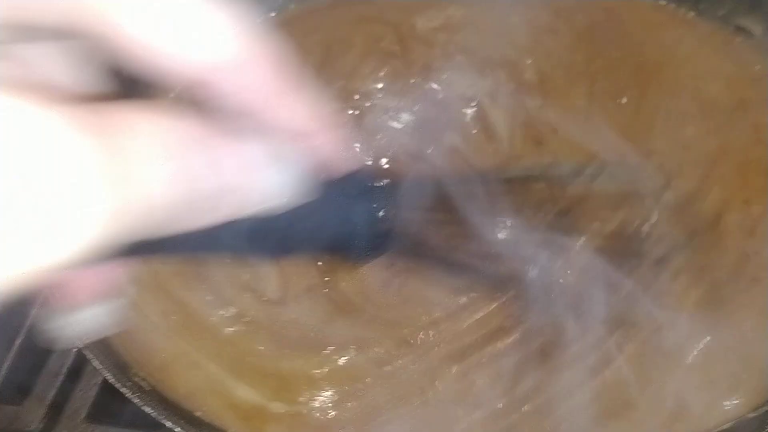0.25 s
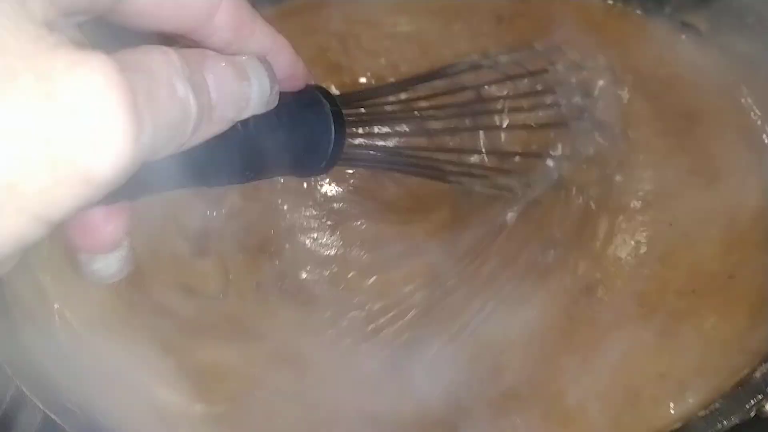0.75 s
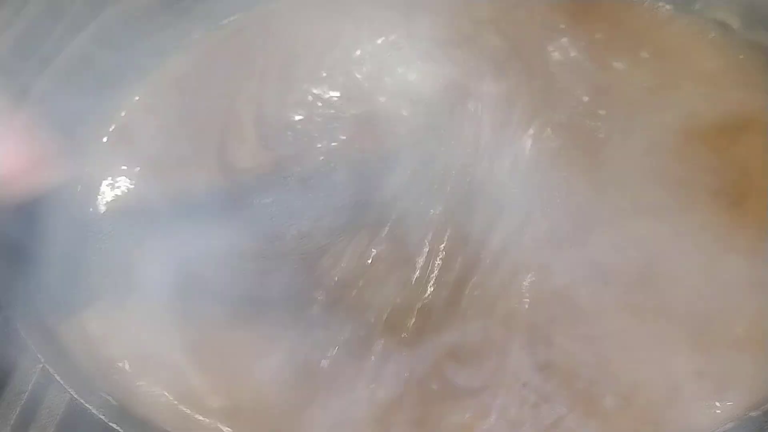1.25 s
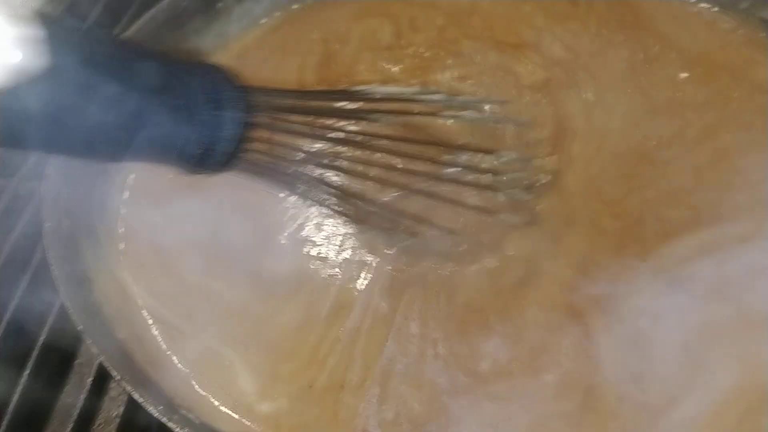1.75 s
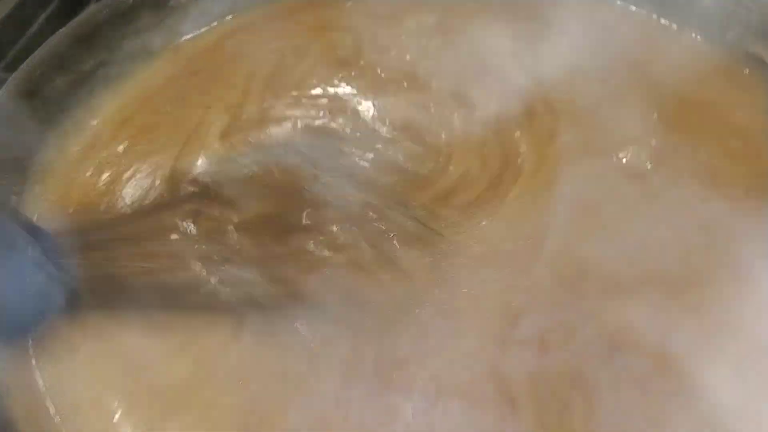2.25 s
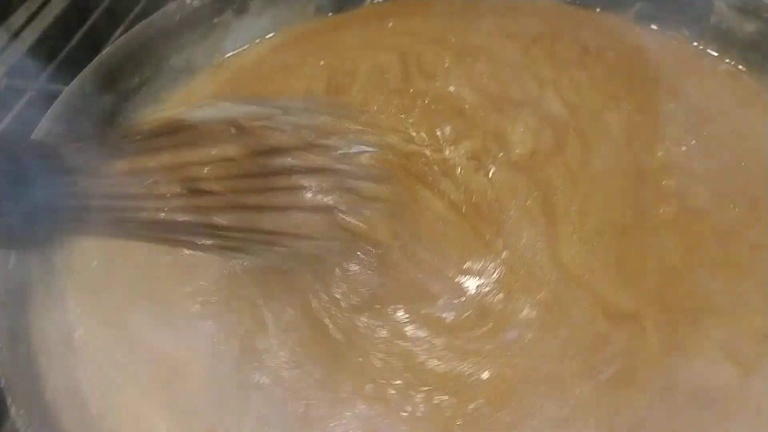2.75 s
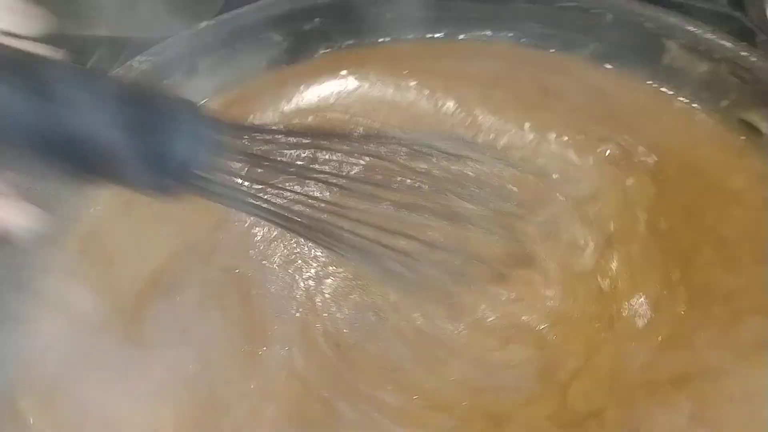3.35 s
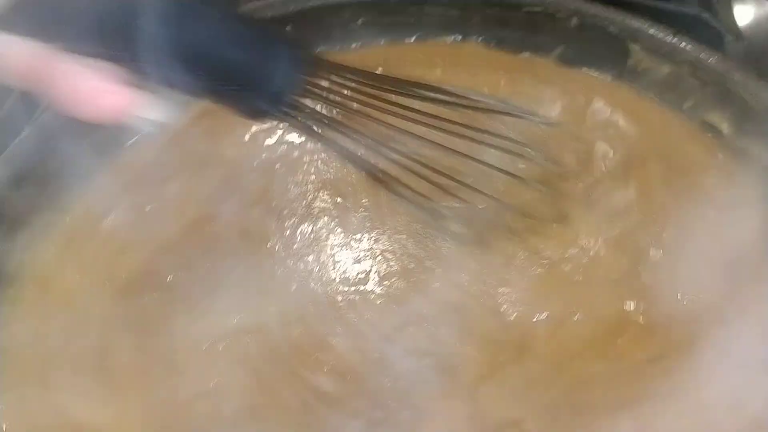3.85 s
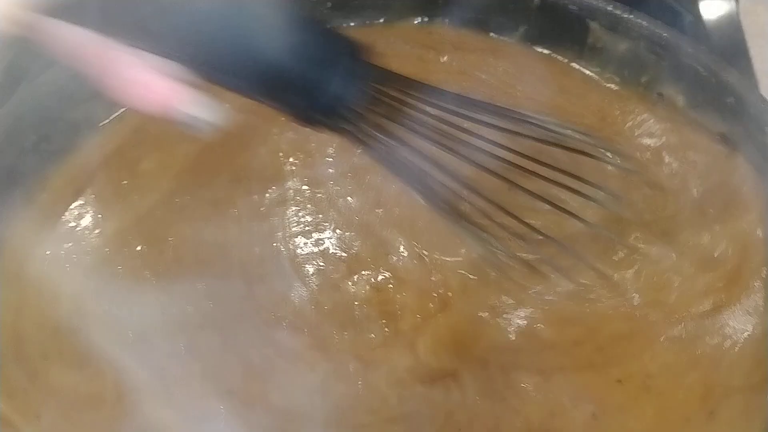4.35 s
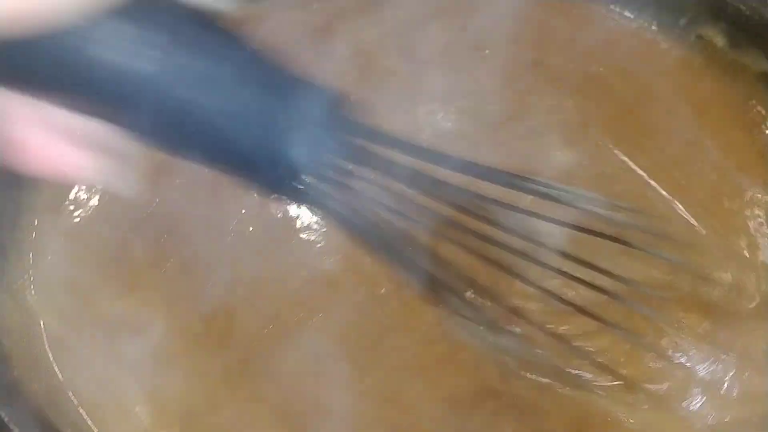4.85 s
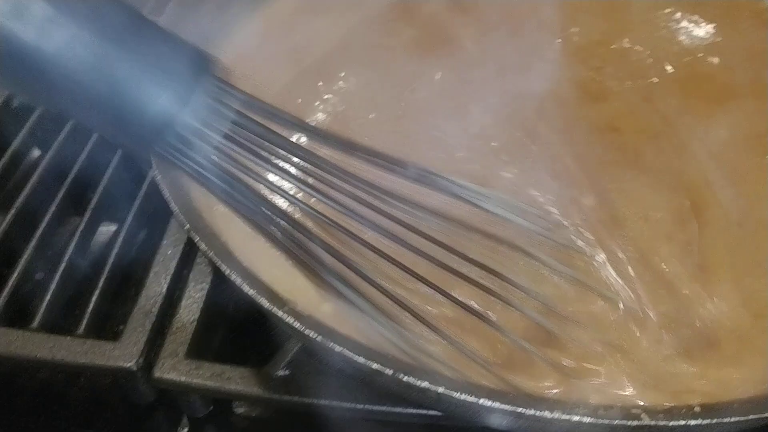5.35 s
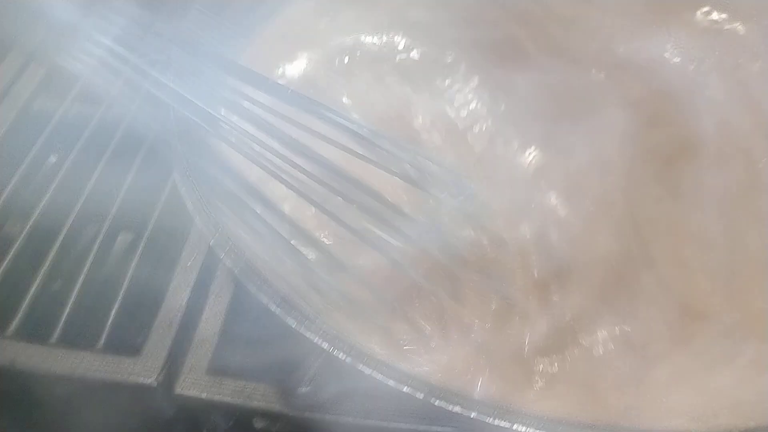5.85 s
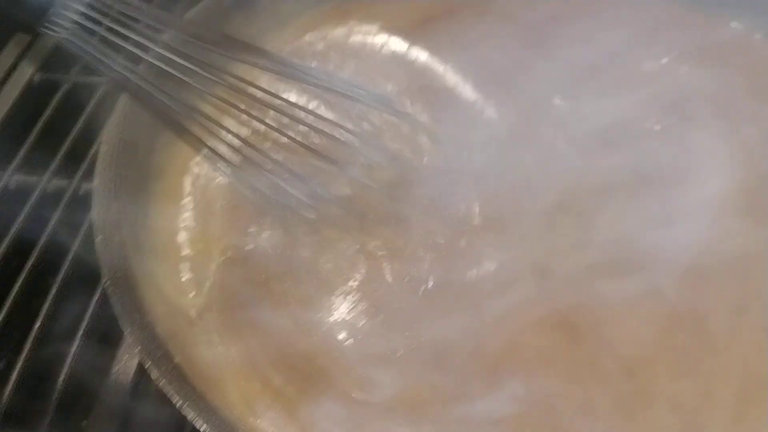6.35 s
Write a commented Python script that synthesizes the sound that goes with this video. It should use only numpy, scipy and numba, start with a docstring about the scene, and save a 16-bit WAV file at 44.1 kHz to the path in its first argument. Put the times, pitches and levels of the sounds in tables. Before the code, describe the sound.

Quick, gritty swishes of thin wires on metal, each swelling and sinking, ring a skillet briefly and hiss brightly above it. After an early crack against the recording device, the separate strokes give way to a short lull, then faster, nearly continuous scrubbing with irregular clicks. Thick liquid sloshes dully underneath. The stereo pickup is very close, and the room is quiet with little echo.

```python
"""In a kitchen, a wire whisk sweeps to and fro through gravy in a metal skillet, a phone held close above.
Noise shaped like tiny slips of the wire tips rings the skillet's fading modes and the thin wires.
Wires also tick against the pan; banded noise makes the slosh of gravy and a faint kitchen hum.
A finger knocks the phone once in a sharp crack, and the pan thuds softly on its grate."""
import sys
import numpy as np
from scipy import signal
from scipy.io import wavfile
from scipy.ndimage import uniform_filter1d
from numba import njit

SR = 44100
rng = np.random.default_rng(int(sys.argv[2]) if len(sys.argv) > 2 else 0)


def digitize_waveform(pressure):
    """Quantize a signal to 16-bit integers and store it at the path in sys.argv[1].

    Rows of a 2-D input are taken as channels; values are limited to [-1, 1].
    """
    field = np.atleast_2d(pressure).T
    bounded = np.clip(field, -1, 1)
    quanta = np.round(bounded * 32767).astype(np.int16)
    wavfile.write(sys.argv[1], SR, quanta)


N = 291501  # length of the scene [samples]
STEP = 32  # slow controls have one value per this many samples

# One row per whisk stroke: (time of full push [s], hold [s], rasp level [dB], lull before it re rasp [dB],
# then re rasp: bowl ring, pan floor, low, middle, high wall modes, wire hiss [all dB],
# push lost during the hold [dB], tilt of the low and of the middle wall modes
# toward their upper members [dB per 10 % of pitch])
WHISK_STROKES = [(0.003, 0.0031, -51.5, 14, -26, -9, -5, -6.5, -12, -12, 10, 0.1, -1),
                 (0.102, 0.062, -42, -16, -16.5, -11, -4.5, -6, -9, -12.5, 1.3, -1, 1.5),
                 (0.288, 0.081, -46.5, -13, -18, -5, 0, -1.5, -9.5, -8, 2, 1, 0),
                 (0.51, 0.066, -43.5, -21, -21, -8.5, 1, -6, -11, -17, 2, 2, 2),
                 (0.69, 0.077, -45, -20, -11, -5, 1, 2, -6.5, -4.5, 2, 1.9, 0),
                 (0.92, 0.068, -43, -18.5, -18, -17, -2.5, -2, -10.5, -10, 2, -0.3, -1),
                 (1.084, 0.055, -39.5, -20, -8.5, -13, -6, -3, -3, -4.5, 2, 0.6, 0.5),
                 (1.284, 0.066, -41.5, -11.0, -18.5, -15, -9.5, -5, -5, -8, -2, 2.3, 0.5),
                 (1.47, 0.047, -41, -17, -13.5, -10.5, -7, -0.5, -5, -5, -1.8, -1.5, -1.7),
                 (1.695, 0.066, -66, 0, -30, -10, -11, -3.5, -16, 5, 4, -6.5, -4.5),
                 (1.776, 0.01, -70, 2, -40, -3, -4, -2, -14, 12, 0.2, -15, -7),
                 (1.874, 0.062, -70, -1.5, -7, 4.5, 5, 1, -16, 2.5, 3, -2.5, 0),
                 (2.045, 0.053, -80, -0.5, 4, -10, -7, -4, -13, 4, -2, 0.1, -6),
                 (2.229, 0.0078, -50.5, -29, 0.5, -5, 3.5, -5, -16, -17, 0.2, -1.3, 1),
                 (2.313, 0.045, -39.5, -16, -11, -8, -3.5, -2.5, -3, -5, -2.5, 1.3, -0.5),
                 (2.422, 0.042, -42, -7, -14.5, -13, 0.5, -6, -8.5, -11.5, 0.5, -0.5, -0.5),
                 (2.582, 0.023, -41.5, -10.5, -11.5, -4.5, -2, -0.5, -3, -6, -2.5, -1, 1),
                 (2.699, 0.04, -38.5, -8.5, -20.5, -14, -1.5, -8.5, -8.5, -10.5, -1.5, -2.5, 0.5),
                 (2.818, 0.049, -40.5, -8, -13.5, -5, -2, -1, -8, -6.5, -1.3, -4, 1),
                 (2.968, 0.029, -37.5, -13, -11.5, -7.5, -0.5, -7, -2.5, -7.5, -2, -0.5, -1),
                 (3.077, 0.046, -37.5, -9, -16.5, -6.5, -4, -8.5, -8.5, -8.5, 1.5, -1, -1),
                 (3.223, 0.017, -39.5, -12, -11, -3.5, -5.5, -5, -3.5, -7.5, -5, 4, 2.5),
                 (3.333, 0.043, -40.5, -9.5, -12, -2.5, -0.5, -6, -12, -7, -1, 2, 0.1),
                 (3.477, 0.037, -37, -16.5, -16, -4.5, -2, -1.5, -8, -7.5, 4.5, 5, 2.5),
                 (3.585, 0.061, -41, -9, -14.5, -10, -3.5, -2, -10.5, -5, 1, 2, 3.5),
                 (3.727, 0.03, -38, -17, -19, -6.5, -2, 0, -7.5, -7.5, 5, 1.5, -2),
                 (3.836, 0.039, -42.5, -7.5, -19.5, -9, -2.5, -1, -5.5, -3, -4.5, 5, 4.5),
                 (3.969, 0.041, -42, -12.5, -17, -4, 0.5, 0, -8, -5, -1, 1.5, 3.5),
                 (4.075, 0.05, -40, -10, -29, -14, -7.5, -6, -7, -5.5, 2, 2.5, 2.5),
                 (4.23, 0.025, -38.5, -16.5, -21, -4.5, -2.5, -8, -10.5, -10.5, 4.5, 0.1, 3),
                 (4.331, 0.046, -42.5, -7, -17.5, -13, -6, -5, -6, -3, 2.5, -1, -2.5),
                 (4.474, 0.036, -41, -9.5, -14.5, -5, -3.5, -2.5, -11.5, -10, 0, -7, 4),
                 (4.578, 0.025, -38.5, -12, -47, -15, -11, -8, -9, -4.5, -4, -4, 4.5),
                 (4.73, 0.042, -39.5, -8, -8.5, -2.5, -10.5, -3.5, -9, -10.5, 2.5, -4, -5.5),
                 (4.833, 0.036, -35, -16, -42, -15.5, -21, -11.5, -7.5, -11.5, -3.5, -4, -0.5),
                 (4.989, 0.03, -38.5, -6.5, -5, -9.5, -5.5, -6, -6.5, -6.5, 0.8, -2, 2),
                 (5.088, 0.043, -38.5, -16, -25.5, -10, -3.5, -3, -4, -3, 2, 0, 0.1),
                 (5.238, 0.043, -42, -8.5, -12.5, -15, 4.5, -3, -2, -4.5, -0.3, -4, 0.1),
                 (5.349, 0.021, -34.5, -14.5, -16, -21, -3, -7.5, -4.5, -12, -1, 2.5, 4),
                 (5.472, 0.041, -39, -4, -21, -30, -9, -4, -5.5, -5.0, -2.5, 1, -1),
                 (5.585, 0.04, -40.5, -8.5, -13, -16, -4, -1, -6.5, -7, -0.5, 2, -2.5),
                 (5.72, 0.041, -36, -9, -30, -35, -11, -7, -2.5, -5, -2.5, 3, 1.5),
                 (5.824, 0.074, -39.5, -6, -15.5, -20, -3.5, -7, -10.5, -9, 1, -2, -2.5),
                 (5.97, 0.039, -37, -16.5, -41, -19, -8.5, -4.5, 1, -1, 1.5, -2, 1),
                 (6.091, 0.051, -42, -5.5, -11, -21, -2.5, -3.5, -3, -7.5, 3, 3, -3),
                 (6.212, 0.042, -36.5, -19.5, -33, -23.5, -4.5, -4.5, -1.5, -3.5, -1.5, 2.5, 4),
                 (6.33, 0.053, -45.5, -5.5, -5, -7, -0.5, -4, -2.5, -2.5, 2.5, 3.5, 0),
                 (6.475, 0.022, -39.5, -15.5, -16.5, -15, -5.5, -2.5, -2, -4.5, 1, 5.5, 2),
                 (6.582, 0.022, -38, -7.5, -21, -13.5, -11, -1, -5.5, -7, -3, 6.5, -5)]
# Groups of close skillet modes: (centre [Hz], spread [Hz], time to fade by 60 dB [s],
# level at pan centre [dB], level near rim [dB], left minus right [dB])
PAN_MODES = [(411, 25, 0.5, -20, -12.5, 11.5), (495.4, 85, 0.18, -13, -14, 1),
             (619.1, 42, 0.21, 3.5, -1, 1), (748.4, 116.5, 0.29, -9, -20.5, 13),
             (997, 101, 0.29, -6, -12.5, -5), (1107, 116.5, 0.15, -11.5, -0.5, -4),
             (1191, 144, 0.093, 0.5, -19, 3), (1501, 133, 0.12, -0.5, -31, -7),
             (1720, 170, 0.086, -8, -6, -3.5), (1831, 95, 0.1, -11.5, -7, -15),
             (2012, 280, 0.15, -6.5, -22, -9.5), (2271, 78, 0.1, -8, -15, -11),
             (2433, 155, 0.05, -16, -4, -11), (2505, 140, 0.094, -24.5, 0.5, -14),
             (2746, 206, 0.09, -13.5, -5, -10.5), (3064, 140, 0.064, -9, -31.5, -11),
             (3383, 148, 0.22, -15.5, -7.5, -2.5), (3862, 186, 0.057, -8, -1.5, -7),
             (3986, 176, 0.058, -11.5, -9, -10.5), (4274, 110, 0.043, -12.5, -11, -4.5),
             (5230, 270, 0.049, 0.5, -0.9, 1), (5647, 420, 0.039, -14.5, -2, -2)]
# Resonances of the whisk wires: (centre [Hz], width setting [Hz], relative level at pan centre [dB],
# relative level near rim [dB], left minus right [dB])
WIRE_RESONANCES = [(4560, 210, -9, -10, 10), (5900, 390, -3, -15, 1.5), (6920, 720, -8, -3.5, 2),
                   (8314, 840, -4, 0, -1), (9326, 780, 0.5, -1, -2.5), (10770, 1000, -5.5, 0.5, -0.5),
                   (12900, 1300, -5, -4.5, -5), (14900, 4400, -6.5, 1, -2)]
# Wires slap the pan: (time [s], level setting [dB], pan ring relative to it [dB])
WIRE_TICKS = [(0.113, -59, 3), (0.524, -38.5, 10), (0.5926, -42, 7), (0.8665, -54, -12),
              (0.8752, -43.5, 19), (0.9271, -32.5, 10), (1.05, -34, 0.5), (1.227, -36, -3),
              (1.2447, -40, 12), (1.389, -37.5, -21), (1.6253, -56, -3), (1.6867, -31, 6), (1.785, -52, 3),
              (1.9288, -57.5, 27), (2.0414, -58, -3), (2.185, -65, 29), (2.2493, -37, 9), (2.273, -44, -10),
              (2.302, -58, 7), (2.5682, -41, 14), (2.801, -50.5, 26), (2.928, -42, 15), (3.2176, -50, -7),
              (3.4572, -26, -21), (3.572, -52, 6), (3.704, -25.5, -27), (3.9534, -24, -33),
              (3.9693, -37, -5), (4.212, -32.5, -22), (4.479, -28.5, -7), (4.5706, -57, -3),
              (4.7366, -41, 16), (5.0728, -39, 21), (5.2, -44, 8), (5.338, -47, 9), (5.381, -38, 7),
              (5.3996, -28, -25), (5.413, -20.5, -9), (5.559, -27.5, -22), (5.671, -42.5, 19),
              (5.7096, -45, 3), (5.807, -34, 9), (5.967, -44, 0), (6.206, -39, 15), (6.4591, -24, 2),
              (6.487, -34, -5)]
# The pan rocks on its grate: (time [s], peak before the left-right split [dB])
PAN_THUDS = [(0.718, -52.5), (1.888, -77), (2.175, -66), (2.578, -54), (2.944, -68), (3.089, -66),
             (3.868, -64), (4.799, -57), (5.122, -65), (5.816, -70)]
# A finger on the case by one microphone port: (level setting [dB], left minus right [dB], decay [s])
FINGER_KNOCK = (-31, -28.5, 0.00035)
# Kitchen hum bands: (centre [Hz], filter width [Hz], level before wavering [dB], left-right likeness [0-1])
KITCHEN_HUM = [(59.7, 29, -88, 1), (94, 19, -82, 0.94), (168, 110, -86.5, 0.78), (232, 21, -83.5, 0.7),
               (330.6, 63, -74.5, 0.65), (416, 30, -70.5, 0.9), (2400, 1500, -92, .1),
               (11200, 1700, -83.5, .05)]
# Gravy pushed by the wires: (base pitch [Hz], width setting [Hz])
SLOSH_TONE = (208.2, 174)
# Level of the gravy before its quick wavering: (time [s], level [dB])
SLOSH_LEVELS = [(0.2, -70), (0.23, -81), (0.32, -72.5), (1.84, -78), (1.89, -67.5), (2.09, -86),
                (2.41, -63), (2.52, -85), (2.8, -63.5), (2.89, -80), (3.3, -64.5), (3.62, -82), (3.66, -65),
                (4.0, -90), (4.16, -62), (4.32, -77.5), (4.91, -63), (5.12, -92), (5.4, -66.5), (5.62, -78),
                (5.69, -68), (6.6, -75.5)]
# Where the whisk works: (time [s], place [0 pan centre to 1 near the rim],
# bowl pitch shift under the gravy [%], high chime before stroke changes, re rasp [dB])
WHISK_ROUTE = [(.13, 0.5, -3, -23), (.32, 0.54, -2, -19.5), (.72, 0.27, -5, -15), (.94, 0.042, 3, -21.5),
               (1.11, 0.027, -0.5, -10.5), (1.5, 0.053, -2, -17.5), (1.72, 0.54, -4, -7),
               (1.9, 0.34, -1.5, -35), (2.06, 0.67, -1, -22), (2.34, 0.24, -1, -19),
               (2.45, 0.37, -2, -20.5), (2.6, 0.46, 2, -19), (2.72, 0.5, -1, -18), (2.85, 0.69, 2, -13),
               (3.2, 0.8, 1.8, -20), (3.6, 0.61, -.5, -15.5), (4.1, 0.59, 0.5, -17),
               (4.35, 0.77, 1.1, -15.5), (4.7, 0.64, -2.5, -18.5), (5.05, 0.85, -0.6, -12),
               (5.28, 0.7, 0.5, -17.5), (5.38, 0.84, 3.5, -15), (5.6, 0.63, 5, -15.5),
               (5.75, 0.71, 5.5, -19), (6.2, 0.86, 6, -17), (6.5, 0.69, -2.7, -13)]
# Pitches that part the modes into bowl, floor, low, middle, high and chime groups: (edge [Hz])
MODE_GROUP_EDGES = [850, 1330, 2120, 3200, 4800]
# Pitches about which the low and the middle wall modes tilt: (pivot [Hz])
TILT_PIVOTS = [1700, 2550]
# Slow drift of colour: (time [s], pitch shift of the low, middle and high wall modes [all %],
# relative level of the hiss above 11.5 kHz [dB])
COLOUR_DRIFT = [(0.1, 0.5, -1.05, 0.73, -4), (0.6, 0.5, 1.15, 0.82, -5), (1.1, -0.86, 0.24, 1, -2),
                (1.6, 0.3, 0.73, 0.11, -0.5), (2.0, 0.3, 0.3, 0.52, -0.5), (2.5, -0.78, -0.86, 0.3, 0),
                (3.0, 0.16, -1.17, 0.47, -0.5), (3.5, 0.23, -1.25, 0.6, -0.5), (4.0, 0.54, 0.43, 0.41, 0),
                (4.5, -2.1, 0.6, 0.35, 2), (4.9, -1.8, -0.25, -0.44, -1.5), (5.3, -0.82, 0.72, -0.69, 2.5),
                (5.7, -1.6, 1.04, -0.46, 0), (6.1, -2.1, 1.24, -0.92, -1.5), (6.5, -1.8, 1.4, -0.68, 3)]

RISE_SHARE_PER_10_DB, SHORTEST_RISE_S = 0.24, 0.0038  # share of the gap spent climbing, per 10 dB of lull
FALL_SHARE, LONGEST_FALL_S = 0.58, 0.09  # share of the rest of the gap spent sinking; then the level rests
CHIME_PER_HIGH = 0.85  # strokes that ring the high modes chime more (dB per dB)
BOWL_LATE_S, BOWL_LULL_SHARE = 0.0059, 0.84  # the bowl answers late and sinks less in the lulls
HIGH_LULL_EXTRA = 0.35  # the high modes sink this share deeper between strokes
WANDER = 0.016  # typical share by which the moving gravy detunes each mode group
PORT_LAG_S = 0.00016  # spread of arrival lag between the two microphones as the contact moves
RATTLES_PER_S = 140  # single wires catching and springing free
RATTLE_DB, RATTLE_SCATTER_DB = -4.5, 12  # softest rattle setting re rasp, and range above it
# below this rasp level, the hiss under 9 kHz is thinner (dB lost per dB, per octave)
THIN_BELOW_DB, THINNING = -41, 0.36
TICK_PAN_DB = 1  # left minus right, for the ticks heard in the wires
KNOCK_S = 0.0555
THUD_HZ, THUD_PAN_DB = 100, 2.5  # pitch, and left minus right
THUD_T60_S, THUD_PUSH_S = 0.26, 0.0089  # time to fade by 60 dB, and length of the push
TOP_HZ = 15700  # upper limit of the phone


def undb(db):
    """Turn decibels into a plain gain."""
    return np.exp(np.asarray(db) * (np.log(10) / 20))


def unit(x):
    """Scale a sound to an average (rms) strength of 1."""
    return x / np.sqrt(np.mean(x ** 2))


def sides(db):
    """Left and right gains for a level difference."""
    return undb(np.array([[db / 2], [-db / 2]]))


def band(x, hz, width_hz):
    """Let through sound around one pitch, with gain 1 at the centre."""
    return signal.lfilter(*signal.iirpeak(min(hz, .45 * SR), hz / width_hz, fs=SR), x)


def ring(x, hz, t60):
    """One fading mode as a complex oscillation that turns and shrinks every sample."""
    pole = np.exp((2j * np.pi * hz - np.log(1000) / t60) / SR)
    return signal.lfilter([1], [1, -pole], x)


def walk(rate):
    """Random levels joined by straight lines, rate per second, one per STEP samples; spread near 1."""
    s = np.arange(N // STEP + 1) * STEP / SR
    count = int(N / SR * rate) + 2
    return np.interp(s * rate, np.arange(count), rng.standard_normal(count))


def full(slow):
    """Repeat a slow control up to the sample rate."""
    return np.repeat(slow, STEP, axis=-1)[..., :N]


def shares(count, depth_db, rate):
    """Wandering gains of several modes whose mean power stays 1, one value per STEP samples."""
    gains = undb(depth_db * np.array([walk(rate) for _ in range(count)]))
    return gains / np.sqrt(np.mean(gains ** 2, axis=0))


def bursts(times, dbs, decay_s):
    """Envelope of sudden, fast-fading bursts."""
    hits = np.zeros(N)
    np.add.at(hits, (np.asarray(times) * SR).astype(int), undb(dbs))
    return signal.lfilter([1], [1, -np.exp(-1 / (decay_s * SR))], hits)


def slow_colour(column):
    """One column of the colour drift, one value per STEP samples."""
    table = np.transpose(COLOUR_DRIFT)
    return np.interp(np.arange(N // STEP + 1) * STEP / SR, table[0], table[column])


def sweep():
    """Whisk strokes move from lull to push and sink toward the next lull; colour follows stroke and route."""
    peak, hold, top, lull, *colours, sag, low_tilt, middle_tilt = np.transpose(WHISK_STROKES)
    gap = np.append(0, peak[1:] - (peak + hold)[:-1])
    rise = np.maximum(-RISE_SHARE_PER_10_DB * lull / 10 * gap, SHORTEST_RISE_S)
    fall = np.minimum(FALL_SHARE * np.append((gap - rise)[1:], 1), LONGEST_FALL_S)
    next_lull = np.append((top + lull)[1:], top[-1])
    corners = np.stack([peak - rise, peak, peak + hold, peak + hold + fall], axis=1).ravel()
    corners = np.maximum.accumulate(corners)  # time never runs backwards
    levels = np.stack([top + lull, top + sag / 2, top - sag / 2, next_lull], axis=1).ravel()
    t = np.arange(N) / SR
    rasp = np.interp(t, corners, levels)

    # each stroke keeps its colour while it is held, then glides to the next
    held = np.stack([peak, peak + hold], axis=1).ravel()
    bowl, floor, low, middle, high, hiss = (np.interp(t, held, np.repeat(c, 2)) for c in colours)
    tilts = [np.interp(t[::STEP], held, np.repeat(c, 2)) for c in (low_tilt, middle_tilt)]
    push = np.interp(t, held, np.repeat(top, 2))
    bowl = np.interp(t - BOWL_LATE_S, t, bowl + push + BOWL_LULL_SHARE * (rasp - push))

    at, *route = np.transpose(WHISK_ROUTE)
    place, load, chime = (np.interp(t, at, c) for c in route)
    high = high + HIGH_LULL_EXTRA * np.minimum(rasp - push, 0)
    chime = chime + CHIME_PER_HIGH * (high - np.mean(high))
    groups = [bowl, *(rasp + np.array([floor, low, middle, high, chime]))]
    return tilts, rasp, groups, rasp + hiss, place, load


def grit(scatter_db, clump_db, clump_rate):
    """Sizes of the tiny slips of many wire tips on rough metal; they come in clumps."""
    return unit(undb(scatter_db * rng.exponential(size=N) + clump_db * full(walk(clump_rate))))


@njit
def wobble(x, shares, poles, lags, step):
    """Close modes whose drive and pitch move, heard at two ports with moving lags."""
    out = np.zeros((2, len(x)))
    for k in range(len(poles)):
        z = 0j
        for j in range((len(x) + step - 1) // step):
            share, pole, lag = shares[k, j], poles[k, j], lags[k, j]
            for i in range(j * step, min((j + 1) * step, len(x))):
                z = z * pole + share * x[i]
                out[0, i] += z.imag
                out[1, i] += (z * lag).imag
    return out


def skillet(tilts, rasp_db, groups_db, place, load, count=3):
    """Slips and slaps ring the pan; each mode waxes, wanes and bends as contact and gravy move over it."""
    tick_s, tick_db, tick_ring_db = np.transpose(WIRE_TICKS)
    slips = grit(0.38, 1.43, 70)
    drives = [slips * undb(db) for db in groups_db]
    slaps = bursts(tick_s, tick_db + tick_ring_db - 6, 0.0018)
    clicks = bursts(tick_s, tick_db - 3.5, 0.00091)

    # wires catch and spring free at random moments
    caught = np.sort(rng.random(int(RATTLES_PER_S * N / SR))) * (N - 1) / SR
    sizes_db = rasp_db[(caught * SR).astype(int)] + RATTLE_DB
    sizes_db = sizes_db + RATTLE_SCATTER_DB * rng.random(len(caught))
    rattles = bursts(caught, sizes_db + 3.0, 0.00092)
    clicks = clicks + bursts(caught, sizes_db, 0.0005)

    place, load = (np.append(c, c[-1])[::STEP] for c in (np.clip(place, 0, 1), load))
    out = 0
    reaches = shares(len(PAN_MODES), 4.5, 13)
    for (hz, spread, t60, centre_db, rim_db, pan_db), reach in zip(PAN_MODES, reaches):
        group = np.searchsorted(MODE_GROUP_EDGES, hz)
        # broad low modes depend less on the contact point; thin wires slap the middle modes best
        slap_loss_db = 4 * abs(np.log2(hz / 2600)) + 10 * (hz > 4800)
        reach = full(reach ** min(hz / 1800, 1))
        hits = slaps + rattles * reach * (group > 1)  # rattles leave bowl and floor alone
        force = drives[group] * reach + hits * undb(-9.0 - slap_loss_db)
        # the tiny offset keeps the filter away from vanishingly small numbers
        push = band(rng.standard_normal(N) * force, hz, 0.37 * hz + 40) + 1e-18

        bend = 1 + WANDER * walk(7) + (group == 0) * load / 100
        if group in (2, 3, 4):
            bend = bend + slow_colour(group - 1) / 100
        spots = (np.arange(count) + 0.24 + rng.random(count) / 2) / count - .5
        f = hz + spread * spots[:, None]
        poles = np.exp((2j * np.pi * f * bend - np.log(1000) / t60) / SR)
        lags = np.exp(2j * np.pi * f * PORT_LAG_S * np.array([walk(5) for _ in f]))

        gains = shares(count, 6.0, 18) * undb(centre_db + (rim_db - centre_db) * place)
        if group in (2, 3):
            gains = gains * undb(tilts[group - 2] * 10 * np.log(hz / TILT_PIVOTS[group - 2]))
        evened = np.sqrt(np.log(1000) / (t60 * SR))  # long rings would otherwise pile up louder
        out = out + sides(pan_db) * evened * wobble(push, gains, poles, lags, STEP)

    # coarser scratches and clicks also radiate straight from the contact, filling the gaps between modes
    scratches = grit(1.7, 1.5, 90) * undb(rasp_db)
    direct = rng.standard_normal((2, N)) * (scratches + clicks)
    direct = band(band(direct, 3260, 3800), 2760, 4600)
    return out + undb(-7.0) * sides(0.67) * direct


def whisk(rasp_db, hiss_db, place, count=3):
    """Strokes and slaps shake the thin wires; each resonance sings in narrow, flickering partials."""
    tick_s, tick_db, _ = np.transpose(WIRE_TICKS)
    slaps = sides(TICK_PAN_DB) * bursts(tick_s, tick_db - 8, 0.0049)
    shake = grit(0.33, 1.93, 100) * undb(hiss_db) + slaps
    drift = np.append(uniform_filter1d(place, SR), place[-1])[::STEP]  # place smoothed over 1 s
    below_db = np.minimum(np.append(rasp_db, rasp_db[-1])[::STEP] - THIN_BELOW_DB, 0)
    out = 0
    for hz, width_hz, centre_db, rim_db, wire_pan_db in WIRE_RESONANCES:
        noise = rng.standard_normal((2, N))
        gain = undb(centre_db + (rim_db - centre_db) * drift + 3.1 * walk(13))
        gain = gain * undb(THINNING * below_db * max(np.log2(9000 / hz), 0))
        if hz > 11500:
            gain = gain * undb(slow_colour(4))
        wire = 0
        for k, share in enumerate(gain * shares(count, 7.0, 25)):
            f = hz + 1.23 * width_hz * ((k + rng.random()) / count - .5)
            wire = wire + full(share / np.sqrt(width_hz)) * band(noise, f, width_hz / 6)
        out = out + sides(wire_pan_db) * wire
    high_pass = signal.butter(2, 3500, "high", fs=SR, output="sos")
    return signal.sosfilt(high_pass, unit(out) * shake)


def gravy():
    """A dull, lumpy slosh: four low noise bands that swell and fade as the gravy is pushed."""
    hz, width_hz = SLOSH_TONE
    s, db = np.transpose(SLOSH_LEVELS)
    lumps = 0
    for f, share in zip(hz * np.array([.82, .97, 1.15, 1.5]), full(shares(4, 5.0, 7))):
        lump = band(band(rng.standard_normal(N), f, width_hz / 5), f, width_hz / 2)
        lumps = lumps + share * unit(lump)
    level_db = np.interp(np.arange(N) / SR, s, db) + 2.4 * full(walk(9))
    return sides(4.5) * unit(lumps) * undb(level_db)


def kitchen():
    """Faint wavering bands of hum and air, made of noise partly shared by left and right."""
    out = 0
    for hz, width_hz, db, like in KITCHEN_HUM:
        mid, side = (unit(band(band(rng.standard_normal(N), hz, width_hz), hz, 2 * width_hz))
                     for _ in range(2))
        like = np.clip(like, 0, 1)
        pair = np.sqrt((1 + like) / 2) * mid + np.sqrt((1 - like) / 2) * side * np.array([[1], [-1]])
        out = out + undb(db + 7.4 * full(walk(9.6))) * pair
    return out


def knock():
    """A short crack through the case, close to the right port, and the case's dull swing."""
    db, pan_db, decay_s = FINGER_KNOCK
    times = [KNOCK_S, KNOCK_S + 0.00122, KNOCK_S + 0.0027, KNOCK_S + 0.0078]
    crack = rng.standard_normal(N) * bursts(times, [db, db, db - 13, db - 20], decay_s)
    swing = ring(bursts([KNOCK_S], [db - 47.5], 0.00099), 150, 0.074).imag
    swing = swing + ring(bursts([KNOCK_S], [db - 38.5], 0.00026), 440, 0.031).imag
    return sides(pan_db) * (0.5 * crack + 2.0 * band(crack, 1930, 620)) + sides(-30.0) * swing


def thuds():
    """Soft pushes ring the low mode of pan and grate."""
    s, db = np.transpose(PAN_THUDS)
    push = np.hanning(int(THUD_PUSH_S * SR))
    push = push * np.sin(2 * np.pi * THUD_HZ * np.arange(len(push)) / SR)
    tone = ring(np.append(push, np.zeros(SR // 2)), THUD_HZ, THUD_T60_S).imag
    hits = np.zeros(N)
    hits[(s * SR).astype(int)] = undb(db)
    return sides(THUD_PAN_DB) * signal.fftconvolve(hits, tone / np.abs(tone).max())[:N]


def scene():
    """Pan, whisk, gravy, kitchen, knock and thuds together."""
    tilts, rasp_db, groups_db, hiss_db, place, load = sweep()
    pan = skillet(tilts, rasp_db, groups_db, place, load)
    return pan + whisk(rasp_db, hiss_db, place) + gravy() + kitchen() + knock() + thuds()


def record(dry):
    """The phone cuts the deep bass and the top."""
    dry = signal.sosfilt(signal.butter(3, 70, "high", fs=SR, output="sos"), dry)
    return signal.sosfilt(signal.ellip(10, .2, 75, TOP_HZ, fs=SR, output="sos"), dry)


dry = scene()
out = record(dry)
digitize_waveform(out)
```